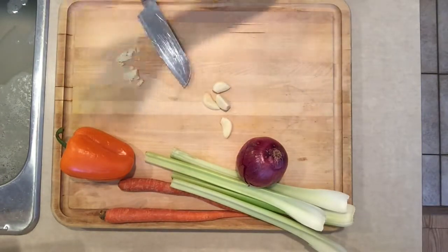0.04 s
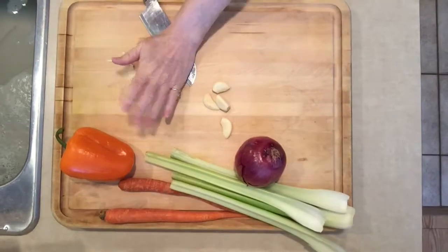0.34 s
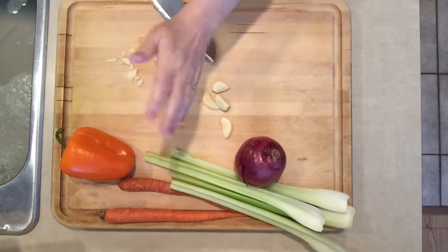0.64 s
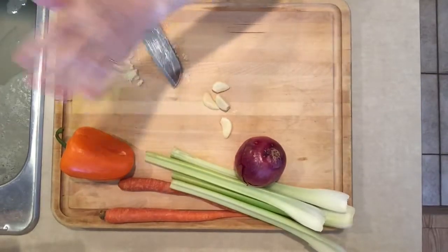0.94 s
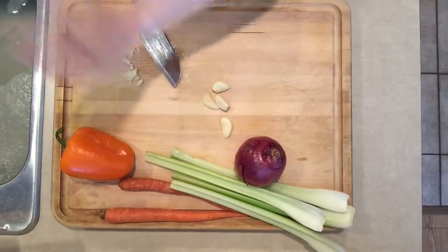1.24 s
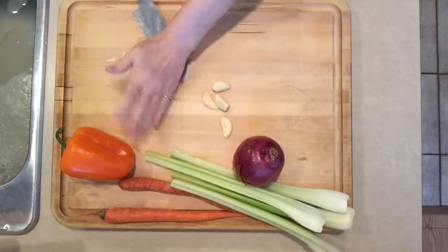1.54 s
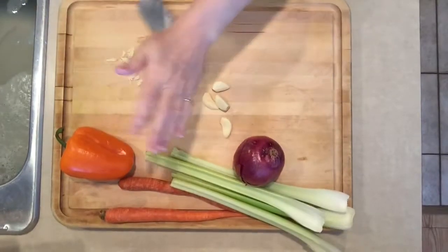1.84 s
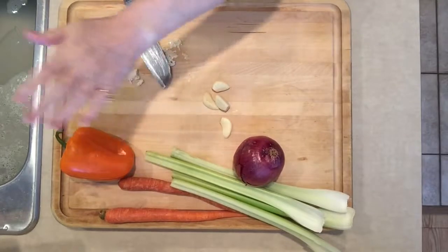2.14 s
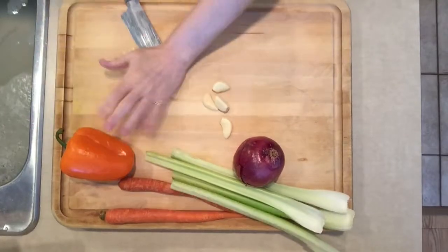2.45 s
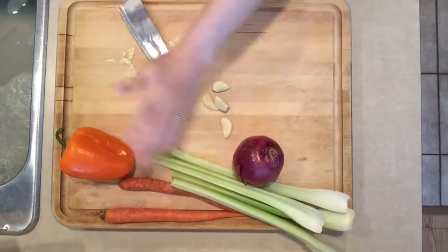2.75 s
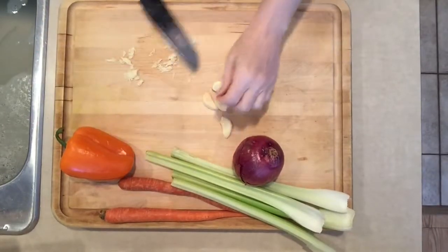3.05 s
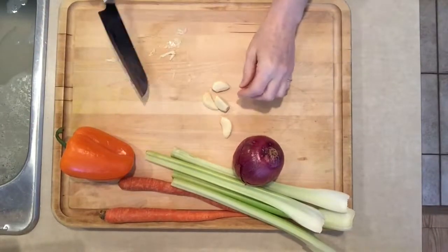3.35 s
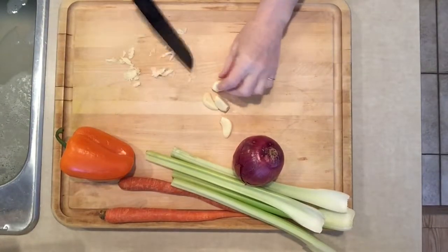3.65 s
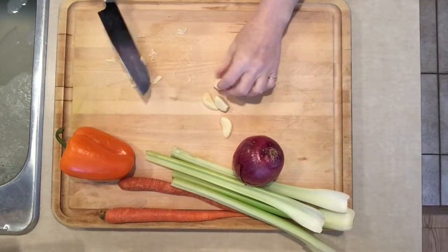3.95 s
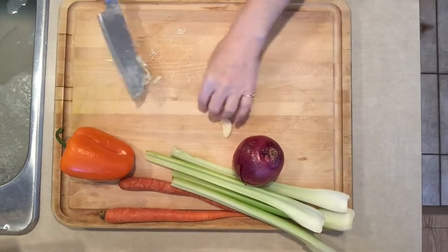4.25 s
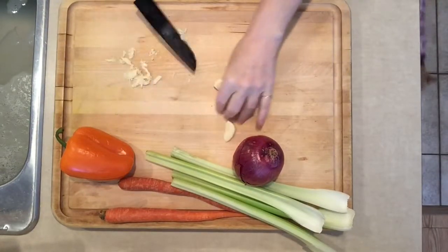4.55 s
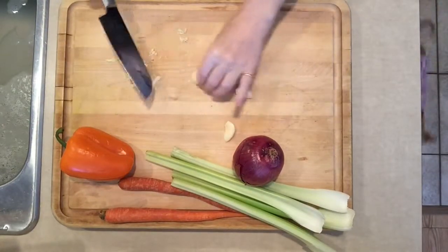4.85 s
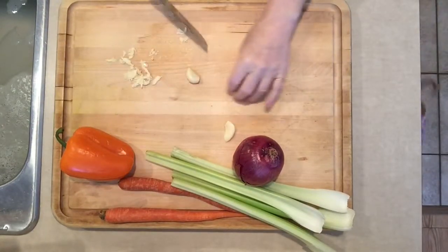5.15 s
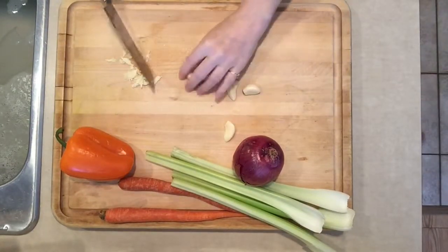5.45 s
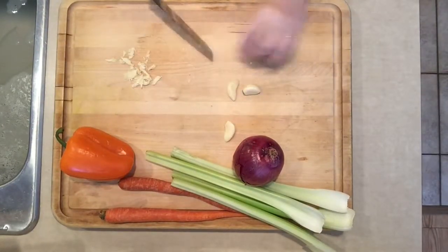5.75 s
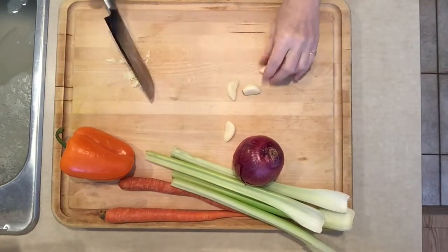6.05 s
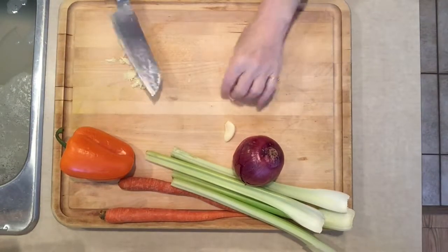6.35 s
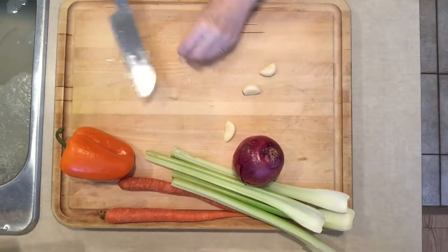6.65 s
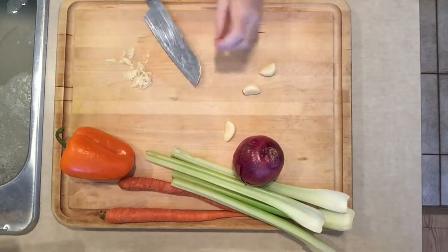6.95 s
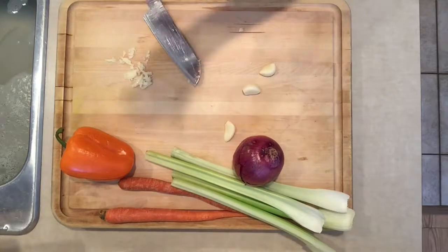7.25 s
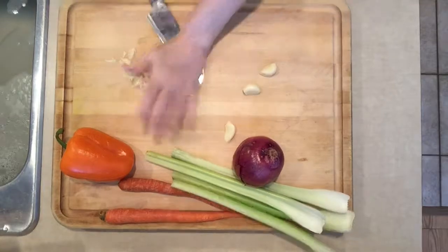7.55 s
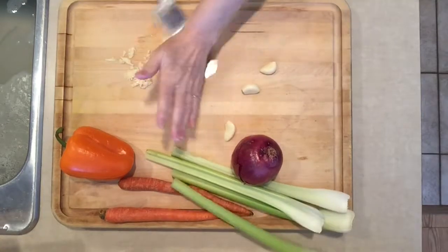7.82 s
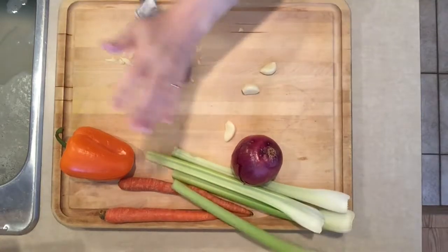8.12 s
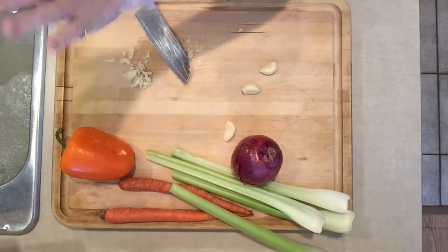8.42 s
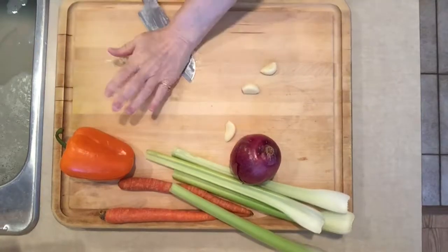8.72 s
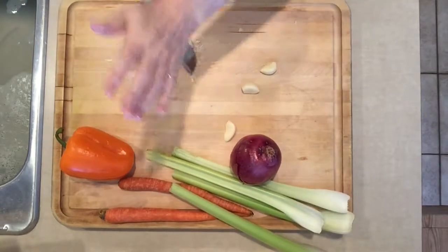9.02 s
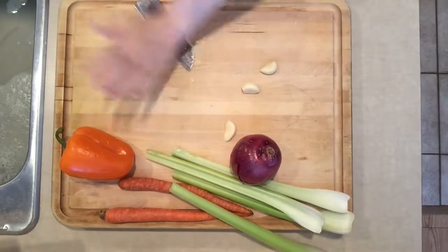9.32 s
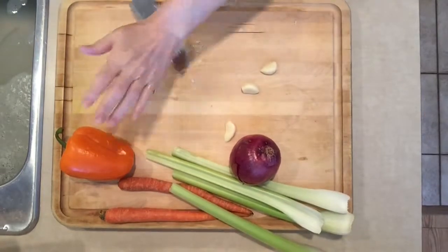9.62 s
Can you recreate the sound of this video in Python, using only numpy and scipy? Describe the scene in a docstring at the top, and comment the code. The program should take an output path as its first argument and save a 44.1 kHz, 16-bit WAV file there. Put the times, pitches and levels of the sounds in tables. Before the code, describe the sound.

Garlic is crushed under a kitchen knife in sharp, booming whacks, with blade clinks, a faint tiny bell and low traffic hum.

```python
"""A palm slams the flat of a kitchen knife onto garlic, six times, close to the microphone in a small
kitchen: each clove bursts, the steel clacks and the wooden board booms. Between blows the blade
clinks, is set down and is wiped clean, and cloves rustle and knock on the board. Farther off, the
pellet in a tiny bell, as on a pet's collar, tinkles faintly. Traffic hums through the wall."""
import sys
import numpy as np
from scipy import signal
from scipy.fft import rfft, irfft
from scipy.io import wavfile

SR = 44100
rng = np.random.default_rng(int(sys.argv[2]) if len(sys.argv) > 2 else 0)


def inscribe(sig):
    """Save sig as 16-bit PCM at rate SR to the path in sys.argv[1].

    A 1-D sig is mono; a 2-D sig holds one channel per row.
    Samples are clipped to [-1, 1] before scaling.
    """
    pcm = np.round(np.clip(np.atleast_2d(sig).T, -1, 1) * 32767)
    wavfile.write(sys.argv[1], SR, pcm.astype(np.int16))


N = 426888
TIME = np.arange(N) / SR
CONTACT_TIME = TIME[:2048]   # spans one brief contact

# Levels in the tables are relative: the functions add their own gains.
# The kitchen's echo, and the microphone's steady hiss: frequency_hz, level_db
ROOM_SPECTRUM = [(60, -26), (180, -16), (330, 11), (700, -1), (1400, 1), (3500, -4), (7000, -2), (15000, 5)]
HISS_DB, HISS_SPECTRUM = -77.5, [(1000, 0.5), (5000, -0.5), (10000, -8.5), (16000, -12.5)]
# How long the walls hold a sound: frequency_hz, t60_s
ROOM_DECAY = [(100, 0.34), (1000, 0.51), (3500, 0.5), (7000, 0.41), (15000, 0.23)]
# Tyre noise from the street: time_s, level_db
TRAFFIC_LEVEL = [(0, -63), (2, -65.5), (4.4, -60.5), (5.5, -54.5), (6.5, -55), (7.4, -54), (8.4, -55.5),
                 (9.68, -56)]
# Traffic as heard through the wall: frequency_hz, level_db
RUMBLE_SPECTRUM = [(25, -20.5), (45, -13.5), (60, 0), (76, -0.5), (100, -11.5), (128, -6), (160, -13),
                   (195, -5.5), (230, -10.5), (270, -18), (400, -26), (650, -33.5), (1100, -81)]
TYRE_SPECTRUM = [(200, -27.5), (380, -6.5), (660, -8), (860, -5), (980, 2), (1100, -6), (1350, -5.5),
                 (1800, -12.5), (2400, -19), (5000, -30), (8000, -36), (16000, -53)]
# Two engines outside, pulling up and easing off: time_s, firing_hz, level_db
NEAR_ENGINE = [(0, 68, -62), (2.5, 68, -59.5), (4.55, 87, -55), (4.85, 69.5, -47.5), (6.5, 71, -51.5),
               (7.1, 76, -45), (7.75, 84, -46), (8.4, 67, -45), (9.68, 67.5, -43)]
FAR_ENGINE = [(4.2, 120.3, -70), (4.7, 124.8, -57), (5.6, 134.5, -51.5), (6.6, 125, -56.5),
              (7.95, 134.3, -46.5), (8.5, 134.2, -68)]

# Modes of the bell, the knife handle on the wood, the board's damped first bounce, and the board
# and counter ringing on: pitch_hz, level_db, t60_s
BELL_MODES = [(4500, 0, 0.14), (7960, 6, 0.069), (12900, 3, 0.077)]
HANDLE_MODES = [(192, -24.5, 0.86), (311, -13, 0.2), (526, -14, 0.061), (1145, 1.5, 0.012),
                (1320, 1, 0.033), (1430, -5, 0.026), (1950, -14, 0.042)]
BOUNCE_MODES = [(180, 3.5, 0.077), (85.8, 3, 0.1)]
BOARD_MODES = [(53.3, -11.5, 0.62), (69.4, -13, 0.32), (90.8, -18.5, 0.44), (103.4, -17, 0.69),
               (134, -5.5, 0.32), (165.7, -11, 0.54), (198.3, -7, .36), (234.7, -13.5, 0.37),
               (285.3, -15.5, 0.47), (310, -15, 0.6), (324.6, -14, 0.5), (356, -21, 0.23), (412, -21, .35),
               (428.5, -13, 0.26), (540, -20, 0.23), (826, -14.5, .28)]
# Modes of the blade, touched at the edge or on the flat: pitch_hz, edge_db, flat_db, t60_s
BLADE_MODES = [(944, -2.5, -23, .15), (1873, -10.5, -17, 0.24), (2200, -12.5, -14.5, .2),
               (2529, -10.5, -7, 0.19), (2960, -13, -25.5, 0.3), (3360, -14.5, -1.5, 0.13),
               (3950, -4, -17.5, 0.33), (4060, -22, -5.5, 0.12), (4580, -3, -4, 0.085),
               (5300, -11, -20, 0.21), (5620, -22.5, -19, 0.24), (6210, -9.5, -20.5, .16),
               (6880, -16.5, -9, 0.15), (7184, -11.5, -17.5, 0.1), (8620, -19.5, -6.5, 0.073),
               (9830, -20.5, -17, 0.1), (10770, -25.5, -24, 0.12), (13900, -21.5, -24.5, .06),
               (15300, -23, -25, .06)]
# Noises of garlic, steel and wood at the board: frequency_hz, level_db
SKIN_SPECTRUM = [(2000, -16), (4000, -8), (5800, 7.5), (9000, -7.5), (13000, -7.5), (16000, -14)]
WIPE_SPECTRUM = [(500, -21), (1000, 12.5), (2000, 15), (3000, 0.5), (4800, 8.5), (7300, 3.5), (9000, -11),
                 (15000, -13.5)]
TICK_SPECTRUM = [(1000, -9), (2000, 7), (3200, 5), (6000, -3), (9000, -20), (15000, -28)]
SIZZLE_SPECTRUM = [(3500, -26), (6500, 6), (8500, 2), (10500, -3), (14000, -3), (16000, -13.5)]
CRACK_SPECTRUM = [(700, -28), (1500, -12), (2200, -6), (2700, -3), (3400, -1.5), (4800, -2.5), (5600, 0),
                  (7000, -6.5), (10000, -17.5), (16000, -33.5)]
CLACK_SPECTRUM = [(1500, -28), (2400, -7.5), (3100, 0), (3550, 1.5), (4200, -2.5), (4800, -13), (8000, -34)]
WOOD_SPECTRUM = [(150, -22), (330, -3), (520, -2.5), (830, -2.5), (1050, -4), (1350, -4.5), (1700, -5.5),
                 (2200, -4), (3500, -22), (9000, -45.5)]

# The bell is shaken: start_s, level_db
BELL_SHAKES = [(2.95, -72), (3.075, -63.5), (3.407, -65), (3.494, -64.5), (4.129, -67.5), (4.19, -62),
               (4.565, -59), (4.89, -63), (4.932, -59), (5.194, -59.5), (5.585, -49.5), (6.005, -61),
               (6.368, -47.5), (6.635, -63), (6.945, -58), (7.262, -56), (7.926, -56), (8.384, -68.5),
               (8.853, -69)]
# Fingers pick at papery cloves: start_s, level_db
SKIN_RUSTLES = [(6.581, -56), (6.74, -65), (6.885, -57), (7.206, -54.5), (7.375, -65)]
# Garlic is rubbed off the steel: start_s, length_s, level_db
BLADE_WIPES = [(0.591, 0.051, -56), (0.673, 0.037, -64), (1.635, 0.038, -52), (3.231, 0.1, -49.5),
               (3.71, 0.18, -51.5), (4.642, 0.15, -53), (5.246, 0.2, -51), (5.829, 0.17, -46.5)]
# The knife is gripped and its handle rocks: start_s, ring_db, tick_db
HANDLE_ROCKS = [(3.1165, -21, -35), (3.1274, -19, -43), (3.1415, -22, -53)]
# The blade flicks free or is tapped: start_s, ring_db, tick_db, place (0 edge, 1 flat), note_hz
BLADE_CLINKS = [(0.203, -56, -76.5, 1, 3480), (.703, -53.5, -61, 0.1, 2940), (0.891, -38, -61, 0, 4595),
                (1.795, -58, -65, .3, 5260), (2.042, -62.5, -70, 0, 3950), (3.673, -43.5, -74, 0, 3950),
                (4.596, -49.5, -73, 0, 3950), (5.217, -44, -62, 0, 3950), (7.527, -54, -63.5, .5, 3950),
                (7.557, -43, -55, .5, 3350), (7.860, -45, -62, .5, 6230), (8.208, -24, -34.5, 1, 5716)]
# Light knocks on the board: the blade rebounds after a blow, or knife and cloves are set down:
# start_s, knock_db, pitch_hz, thud_db, tick_db
BOARD_KNOCKS = [(0.252, -24, 760, -26, -38), (0.912, -28.5, 1270, -34, -48), (0.931, -39, 583, -68, -59.5),
                (1.399, -27.5, 515, -25, -31), (2.073, -32, 747, -42, -59.5),
                (2.495, -15.5, 593, -15.5, -28), (2.504, -44, 533, -46, -30), (2.71, -38.5, 1240, -31, -60),
                (3.671, -36, 1040, -41, -35), (4.602, -35.5, 1000, -43, -35.5),
                (5.217, -23, 863, -35.5, -30.5), (5.787, -32.5, 877, -40, -49),
                (8.208, -32.5, 800, -35.5, -24), (8.239, -29.5, 730, -41, -43)]
# The palm lands on the blade:
# start_s, crack_db, wood_db, sizzle_db, clack_db, tilt_db_per_octave, burst_s, first_touch_db
PALM_SLAPS = [(0.225, -19.5, -14, -25, -7.5, 1, 0.0035, -15),
              (1.3737, -13.5, -11, -23.5, -39, -5, 0.0028, -15.5),
              (2.4782, -18.5, -19, -30.5, -13.5, 0, 0.0013, -27),
              (7.58, -8, -13.5, -26, -6.5, 2, 0.0023, -10.5),
              (8.6091, -18.5, -14, -20.5, -12.5, 0.5, 0.0013, -14),
              (9.414, -21, -19.5, -26.5, -17, -5.5, 0.0021, -16)]


def from_db(db):
    return 10 ** (np.asarray(db) / 20)


def rms_one(x):
    return x / np.sqrt(np.mean(x ** 2) + 1e-20)


def in_time(rows):
    """Each column of a curve, sample by sample."""
    times, *columns = np.transpose(rows)
    return [np.interp(TIME, times, column) for column in columns]


def at_hz(points, hz):
    frequencies, values = np.transpose(points)
    return np.interp(np.log(hz + 1e-9), np.log(frequencies), values)


def add(track, start_s, sound):
    start = max(0, round(start_s * SR))
    track[start:start + len(sound)] += sound[:N - start]


def colour(x, spectrum, size=4096):
    """Causal (minimum-phase) filter with the given spectrum; white noise keeps its power."""
    gains = from_db(at_hz(spectrum, np.fft.rfftfreq(size, 1 / SR)))
    cepstrum = irfft(np.log(gains))
    fold = np.r_[1, np.full(size // 2 - 1, 2), 1, np.zeros(size // 2 - 1)]
    response = irfft(np.exp(rfft(cepstrum * fold)))
    return signal.fftconvolve(x, response / np.linalg.norm(response))[:len(x)]


def ring(clicks, hz, t60):
    """A unit click sets a sine of height 1 ringing."""
    decay, step = from_db(-60 / (t60 * SR)), 2 * np.pi * hz / SR
    return signal.lfilter([0, np.sin(step)], [1, -2 * decay * np.cos(step), decay ** 2], clicks + 1e-18)


def modes(force, table):
    """Modes of one body; neighbours swing in opposite directions."""
    return sum((-1) ** k * from_db(db) * ring(force, hz, t60) for k, (hz, db, t60) in enumerate(table))


def crunch(envelope, spectrum):
    """Dense tiny fractures under an envelope, evened out over pitch and then coloured."""
    fractures = rfft(rng.standard_normal(len(envelope)) * envelope)
    even = irfft(fractures / (np.abs(fractures) + 1e-12)) * envelope ** .25
    grains = colour(even, spectrum)
    return grains * np.linalg.norm(envelope) / np.linalg.norm(grains)


def impact(decay_s, spectrum):
    """A hard contact: a crunch that starts at once and dies away."""
    return crunch(np.exp(-CONTACT_TIME / decay_s), spectrum)


def push(contact_s):
    """A soft contact: a smooth hump of force with unit area."""
    force = CONTACT_TIME * np.exp(-CONTACT_TIME / contact_s)
    return force / force.sum()


def kitchen_echo(x, wet_db=-4, first_echo_s=0.0014, build_s=0.0011, grain_db=3, bands=12):
    """Hard walls near the microphone return a dense tail whose treble dies first."""
    t = TIME[:SR]
    echoes = rfft(rng.standard_normal(SR) * from_db(grain_db * rng.standard_normal(SR)))
    centres, log_hz = np.geomspace(60, 16000, bands), np.log(np.arange(len(echoes)) + 1)
    tail = 0
    for hz, weights in zip(centres, np.eye(bands)):
        band = irfft(echoes * np.interp(log_hz, np.log(centres), weights))
        tail += band * from_db(-60 * t / at_hz(ROOM_DECAY, hz))
    onset = np.clip((t - first_echo_s) / build_s, 0, 1)
    tail = colour(tail * onset, ROOM_SPECTRUM)
    return from_db(wet_db) * signal.fftconvolve(x, tail / np.linalg.norm(tail))[:N]


def street(rumble_db=-51, rumble_follows=.4, waver_db=2, waver_per_s=9):
    """Beyond the wall, rumble and tyre noise swell together and two engines change speed."""
    traffic_db, = in_time(TRAFFIC_LEVEL)
    swell_db = rumble_follows * (traffic_db - traffic_db.mean())
    out = from_db(rumble_db + swell_db) * colour(rng.standard_normal(N), RUMBLE_SPECTRUM)
    out += from_db(traffic_db) * colour(rng.standard_normal(N), TYRE_SPECTRUM)
    knots = np.arange(0, TIME[-1] + 1, 1 / waver_per_s)
    for engine, harmonics in ((NEAR_ENGINE, [(1, 0), (3, -17), (4, -18)]), (FAR_ENGINE, [(1, 0)])):
        firing_hz, level_db = in_time(engine)
        phase = 2 * np.pi * np.cumsum(firing_hz) / SR
        for harmonic, harmonic_db in harmonics:
            waver = waver_db * np.interp(TIME, knots, rng.standard_normal(len(knots)))
            out += np.sqrt(2) * from_db(level_db + harmonic_db + waver) * np.sin(harmonic * phase)
    return out


def collar_bell(gain_db=-15, rattle_s=0.054, split_hz=70, spread_db=4, scatter_hz=55, bounces=10):
    """Across the room a pellet bounces in a bell, waking and detuning each paired partial by chance."""
    out, t = np.zeros(N), TIME[:SR // 5]
    top_hz = BELL_MODES[-1][0]
    for start_s, shake_db in BELL_SHAKES:
        for delay_s in rng.random(bounces) * rattle_s * np.linspace(0, 1, bounces):
            for hz, mode_db, t60 in BELL_MODES:
                strength, detune = rng.standard_normal(2)
                note_hz = hz + scatter_hz * detune * hz / top_hz
                pair = np.sin(2 * np.pi * note_hz * t) + .5 * np.sin(2 * np.pi * (note_hz + split_hz) * t)
                level_db = shake_db + mode_db + gain_db + spread_db * strength
                add(out, start_s + delay_s, pair * from_db(level_db - 60 * t / t60))
    return out


def skin_rustles(snap_s=0.00489, fade_s=.07, crackle_db=-12, grain_db=9):
    """Dry garlic skin snaps, then crackles away."""
    out, t = np.zeros(N), TIME[:SR // 2]
    envelope = np.exp(-t / snap_s) + from_db(crackle_db) * np.exp(-t / fade_s)
    for start_s, level_db in SKIN_RUSTLES:
        noise, roughness = rng.standard_normal((2, len(t)))
        grains = rms_one(noise * from_db(grain_db * np.clip(roughness, -2, 2)))
        add(out, start_s, from_db(level_db) * grains * envelope)
    return colour(out, SKIN_SPECTRUM)


def blade_wipes(attack_s=0.059, release_s=0.13, hiss_db=-5, steel_db=-4, grit_db=-17,
                grain_db=6, t60_scale=0.34, catch_db=3, catches_per_s=200):
    """The edge catches and slips over wet wood: gritty friction makes the half-damped blade sing."""
    pressure = np.zeros(N)
    for start_s, length_s, level_db in BLADE_WIPES:
        lean_in = (TIME - start_s) / attack_s
        lift_off = (start_s + length_s - TIME) / release_s + .5
        pressure += from_db(level_db) * np.clip(np.minimum(lean_in, lift_off), 0, 1)
    catches = np.interp(TIME * catches_per_s, np.arange(N), rng.standard_normal(N))
    noise, roughness = rng.standard_normal((2, N))
    friction = pressure * rms_one(noise * from_db(grain_db * roughness + catch_db * catches))
    steel = sum(from_db(edge_db) * rms_one(ring(friction, hz, t60 * t60_scale))
                for hz, edge_db, _, t60 in BLADE_MODES)
    hiss = from_db(hiss_db) * colour(friction, WIPE_SPECTRUM)
    grit = from_db(grit_db) * colour(friction, SIZZLE_SPECTRUM)
    return hiss + grit + from_db(steel_db) * rms_one(steel) * friction.std()


def handle_rocks(ring_gain_db=-8, tick_gain_db=-2, tick_s=0.013):
    """The handle rocks on the wood with a hollow note."""
    ticks, taps = np.zeros(N), np.zeros(N)
    for start_s, ring_db, tick_db in HANDLE_ROCKS:
        add(taps, start_s, from_db([ring_db + ring_gain_db]))
        add(ticks, start_s, from_db(tick_db + tick_gain_db) * impact(tick_s, TICK_SPECTRUM))
    return ticks + modes(taps, HANDLE_MODES)


def blade_clinks(ring_gain_db=-7, tick_gain_db=-3, bite_gain_db=-7, tick_s=0.015,
                 spread_db=2, note_db=8, note_octaves=.08):
    """Touched steel ticks and rings, its modes weighted by the place of contact; one note stands out."""
    out = np.zeros(N)
    for k, (hz, edge_db, flat_db, t60) in enumerate(BLADE_MODES):
        taps = np.zeros(N)
        for start_s, ring_db, _, place, note_hz in BLADE_CLINKS:
            mode_db = np.interp(place, [0, 1], [edge_db, flat_db]) + spread_db * rng.standard_normal()
            boost_db = note_db * np.exp(-(np.log2(hz / note_hz) / note_octaves) ** 2)
            add(taps, start_s, from_db([ring_db + ring_gain_db + mode_db + boost_db]))
        out += (-1) ** k * ring(taps, hz, t60)
    for start_s, ring_db, tick_db, *_ in BLADE_CLINKS:
        add(out, start_s, from_db(tick_db + tick_gain_db) * impact(tick_s, SIZZLE_SPECTRUM))
        add(out, start_s, from_db(ring_db + bite_gain_db) * impact(tick_s, TICK_SPECTRUM))
    return out


def board_knocks(knock_s=0.0054, tick_s=0.0028, knock_gain_db=-2, tick_gain_db=-3):
    """Light contacts on the board, each a short woody tock with a pitch of its own."""
    out = np.zeros(N)
    for start_s, knock_db, hz, _, tick_db in BOARD_KNOCKS:
        tock = [(hz / 8, -26), (hz / 2, -9), (hz, 0), (hz * 2, -9), (hz * 4, -26), (hz * 10, -55)]
        add(out, start_s, from_db(knock_db + knock_gain_db) * impact(knock_s, tock))
        add(out, start_s, from_db(tick_db + tick_gain_db) * impact(tick_s, TICK_SPECTRUM))
    return out


def board_boom(arm_db=-15.5, thud_gain_db=2, palm_s=0.0002, light_s=0.00017, lag_s=.001, low_cut_hz=220):
    """The arm's weight drives the whole board into the counter; light knocks wake its upper modes."""
    heavy, light = np.zeros(N), np.zeros(N)
    for start_s, *_ in PALM_SLAPS:
        add(heavy, start_s + lag_s, from_db(arm_db) * push(palm_s))
    for start_s, _, _, thud_db, _ in BOARD_KNOCKS:
        add(light, start_s, from_db(thud_db + thud_gain_db) * push(light_s))
    light = signal.sosfilt(signal.butter(2, low_cut_hz, "high", fs=SR, output="sos"), light)
    return modes(heavy, BOUNCE_MODES) + modes(heavy + light, BOARD_MODES)


def palm_slaps(yield_s=0.002218, wood_s=.007, squash_s=0.013, squash_db=-14,
               crack_gain_db=1, clack_gain_db=-4, wood_gain_db=-1):
    """The clove gives a little, bursts and is squashed flat; the palm damps the steel to a dead clack."""
    out, t = np.zeros(N), CONTACT_TIME - yield_s
    squash = from_db(squash_db) * np.exp(-t / squash_s)
    for start_s, crack_db, wood_db, sizzle_db, clack_db, tilt, burst_s, touch_db in PALM_SLAPS:
        burst = np.where(t < 0, from_db(touch_db), np.exp(-(t / burst_s) ** 2) + squash)
        tilted = [(hz, db + tilt * np.log2(hz)) for hz, db in CRACK_SPECTRUM]
        crack = from_db(crack_db + crack_gain_db) * crunch(burst, tilted)
        clack = from_db(clack_db + clack_gain_db) * crunch(burst, CLACK_SPECTRUM)
        sizzle = from_db(sizzle_db) * crunch(burst, SIZZLE_SPECTRUM)
        add(out, start_s - yield_s, crack + clack + sizzle)
        add(out, start_s, from_db(wood_db + wood_gain_db) * impact(wood_s, WOOD_SPECTRUM))
    return out


def scene(bell_direct_db=-3, bell_room_db=2):
    """One microphone by the board: the boom comes direct, sharp sounds echo, the bell is farther off."""
    close = palm_slaps() + board_knocks() + handle_rocks() + blade_clinks()
    close += blade_wipes() + skin_rustles()
    bell = collar_bell()
    echoes = kitchen_echo(close + from_db(bell_room_db) * bell)
    mic_hiss = from_db(HISS_DB) * colour(rng.standard_normal(N), HISS_SPECTRUM)
    return (mic_hiss + street() + echoes + from_db(bell_direct_db) * bell + board_boom() + close)[None]


def record(dry, ceiling=0.55, low_cut_hz=41, high_cut_hz=16200):
    """The microphone drops the deepest bass, peaks are rounded, the top is cut."""
    heard = signal.sosfilt(signal.butter(4, low_cut_hz, "high", fs=SR, output="sos"), dry)
    low_pass = signal.ellip(10, .1, 80, high_cut_hz, fs=SR, output="sos")
    return signal.sosfilt(low_pass, ceiling * np.tanh(heard / ceiling))


dry = scene()
out = record(dry)
inscribe(out)
```